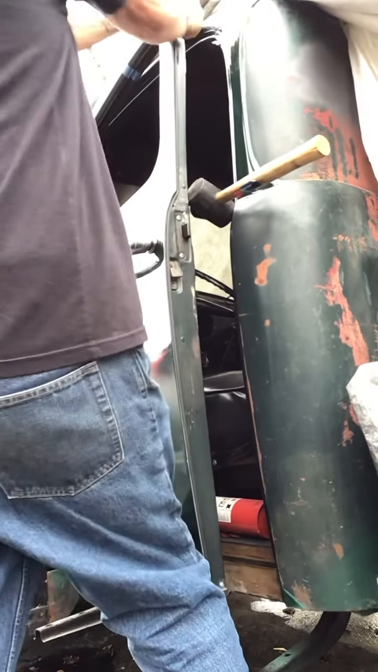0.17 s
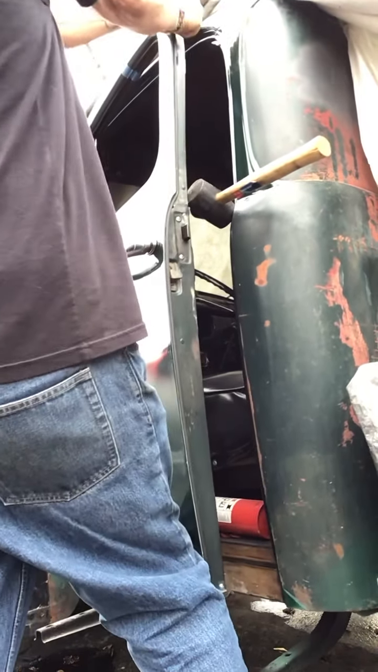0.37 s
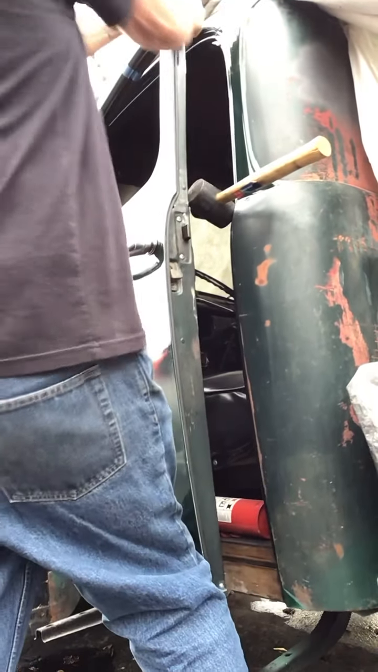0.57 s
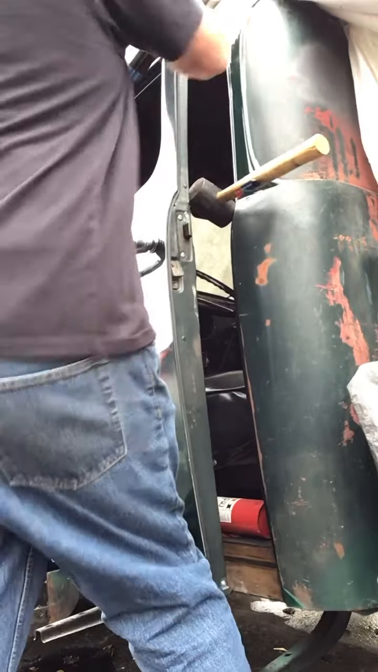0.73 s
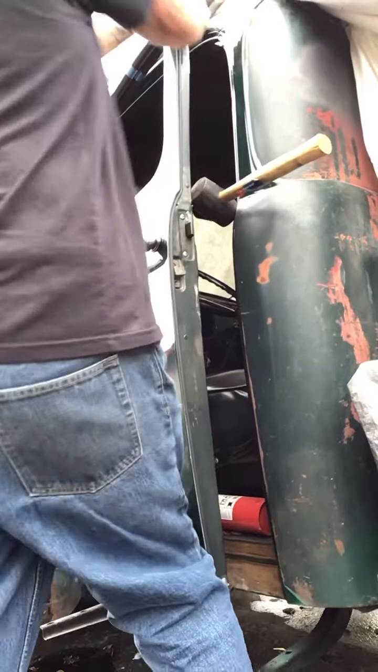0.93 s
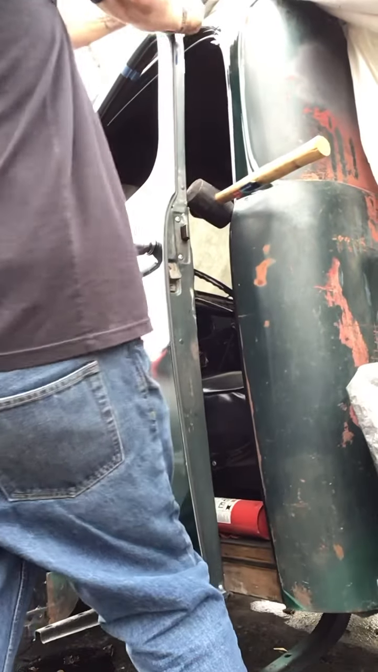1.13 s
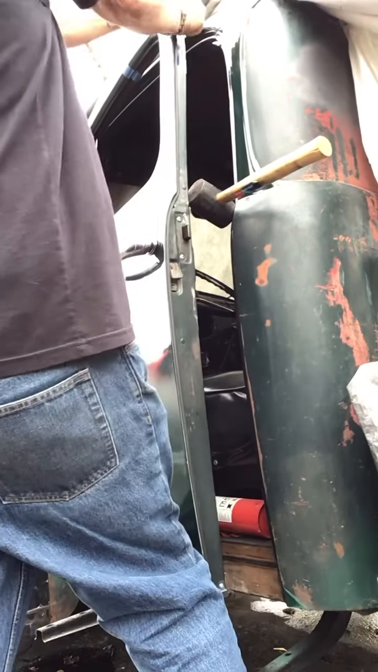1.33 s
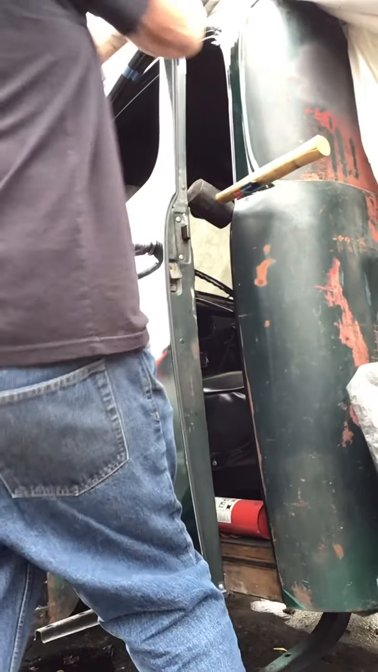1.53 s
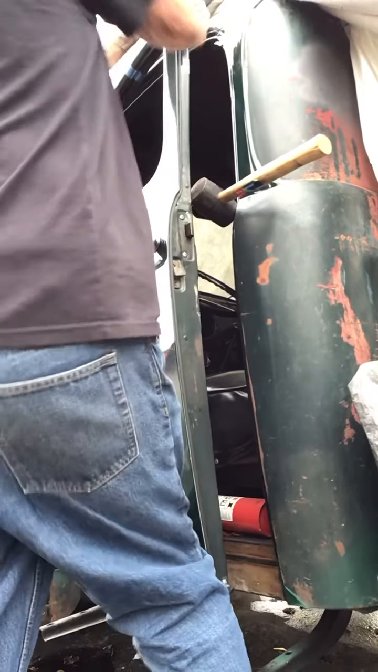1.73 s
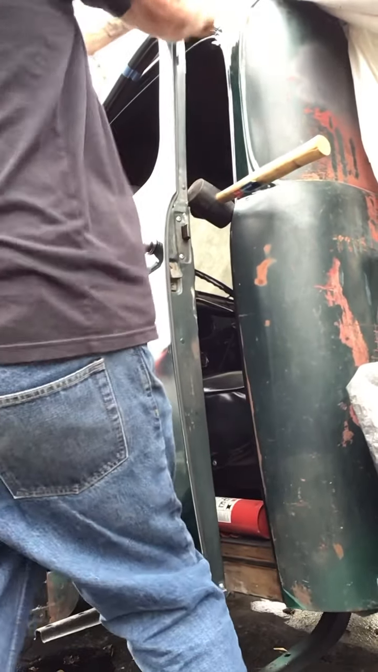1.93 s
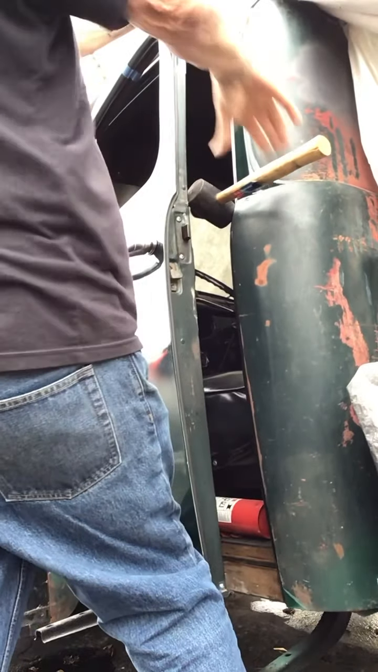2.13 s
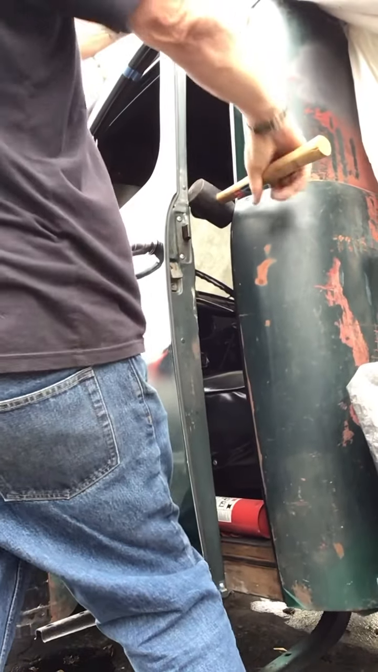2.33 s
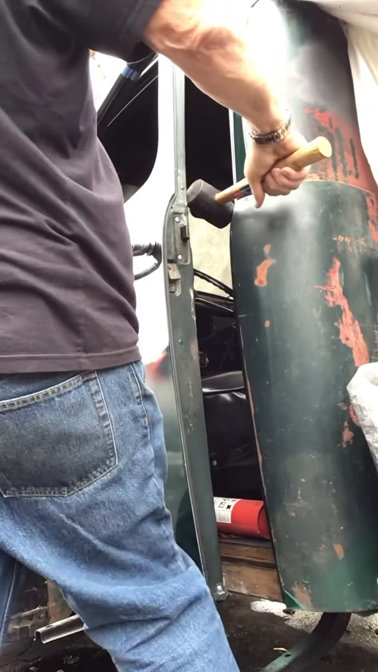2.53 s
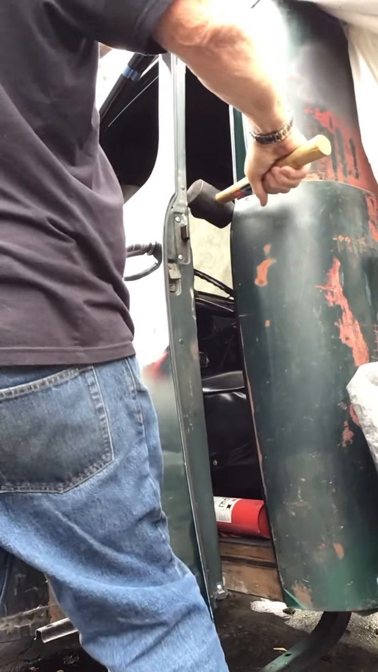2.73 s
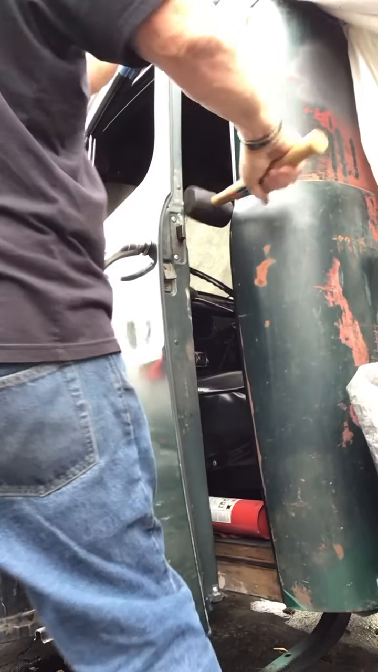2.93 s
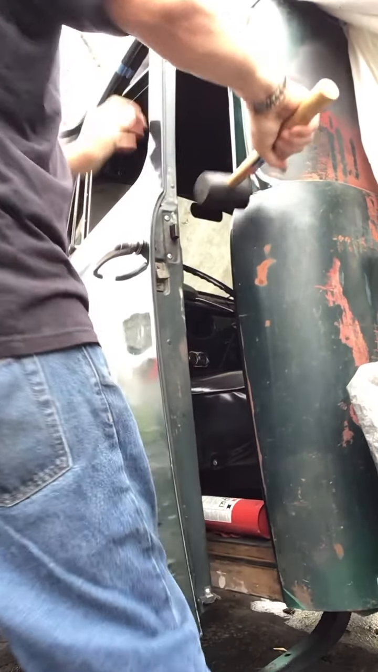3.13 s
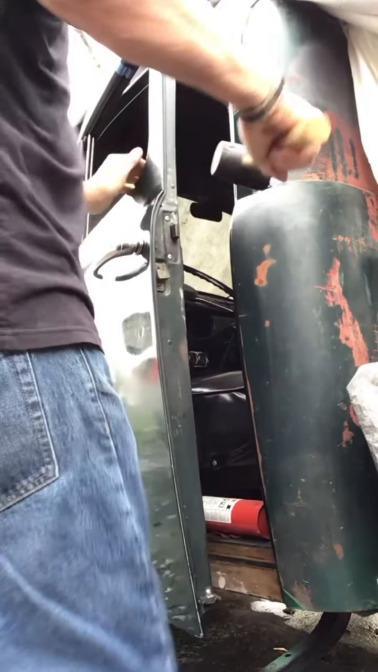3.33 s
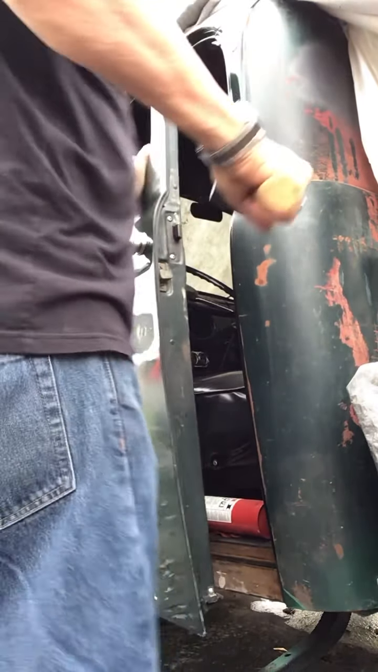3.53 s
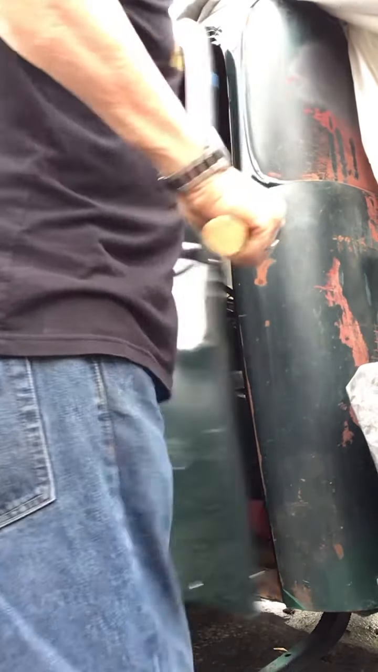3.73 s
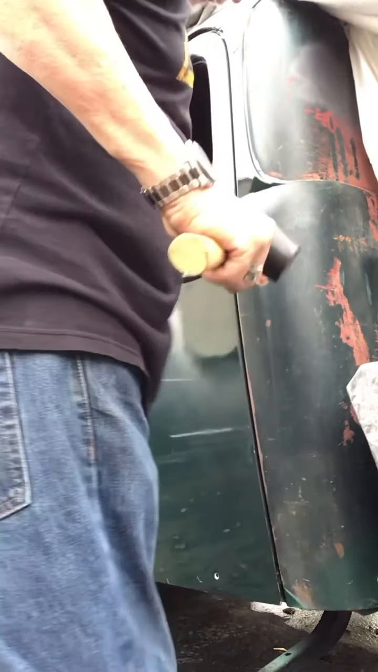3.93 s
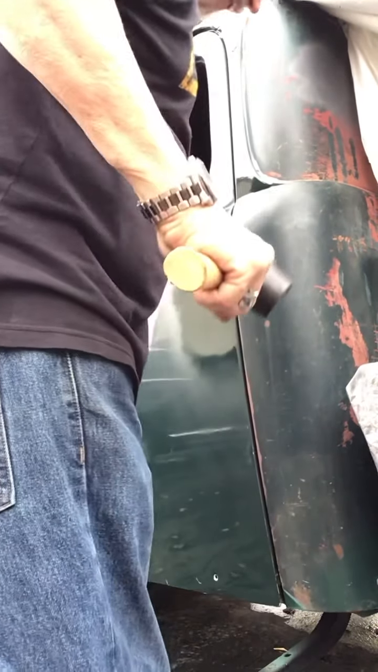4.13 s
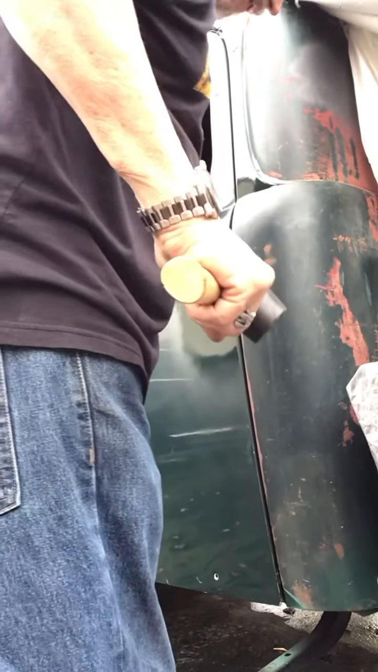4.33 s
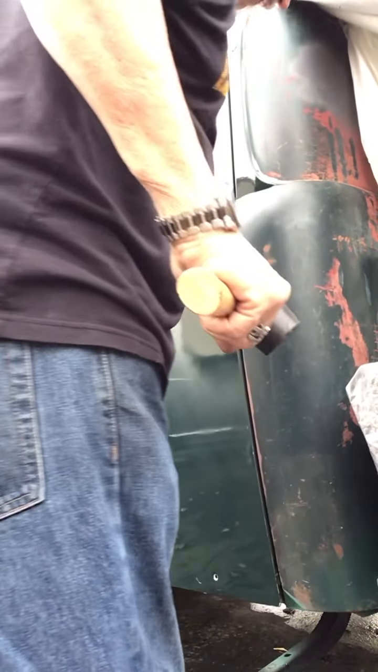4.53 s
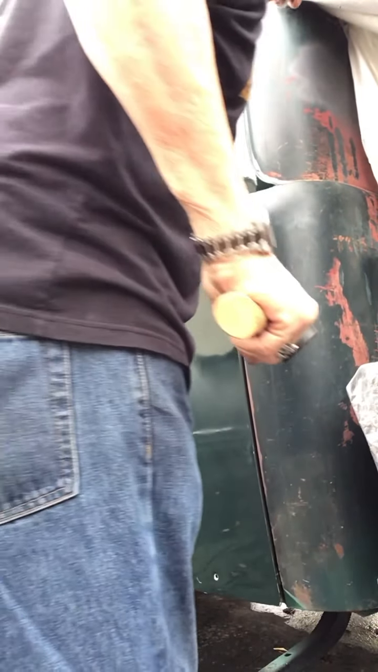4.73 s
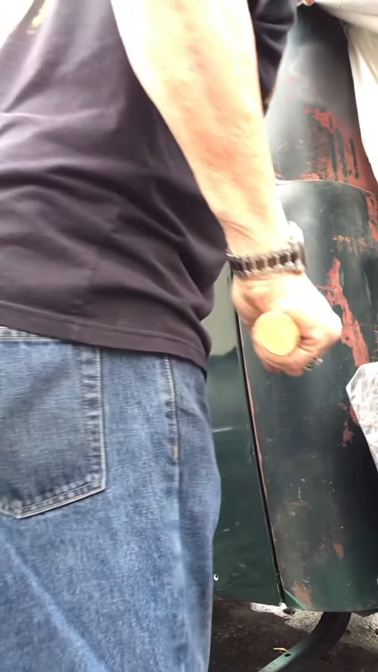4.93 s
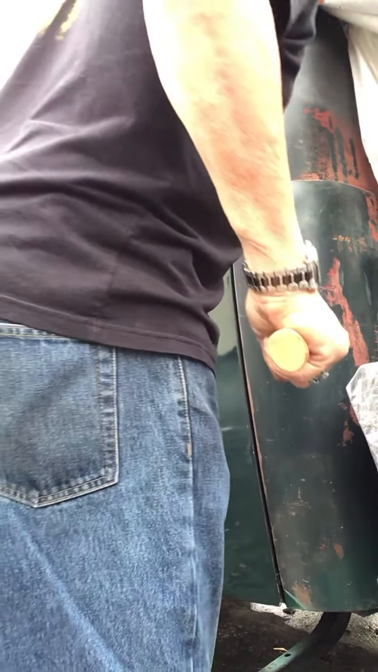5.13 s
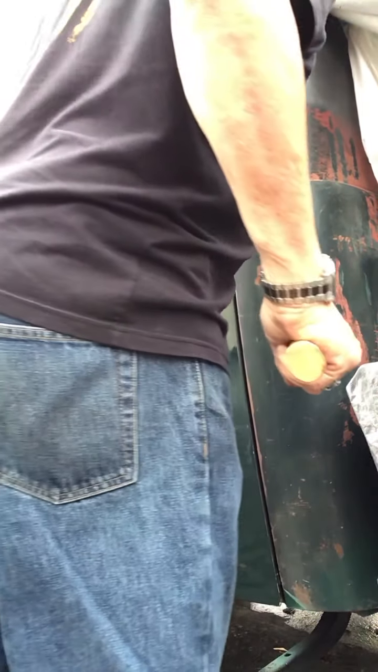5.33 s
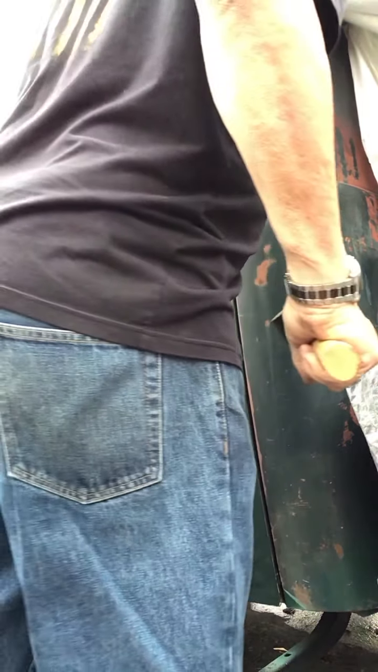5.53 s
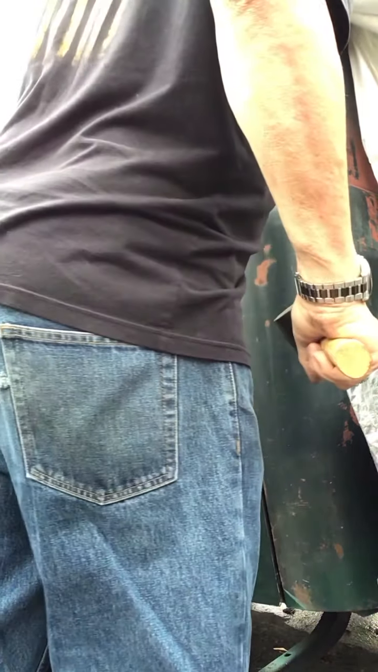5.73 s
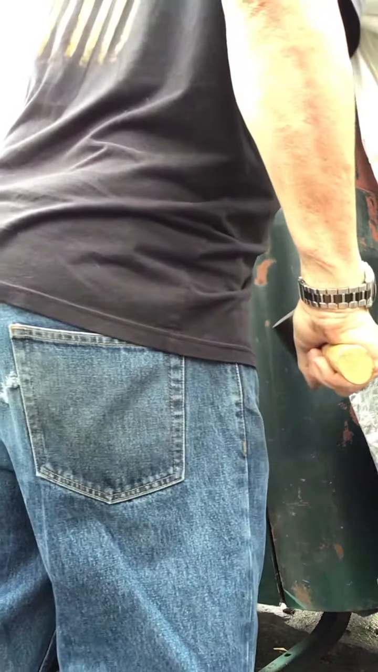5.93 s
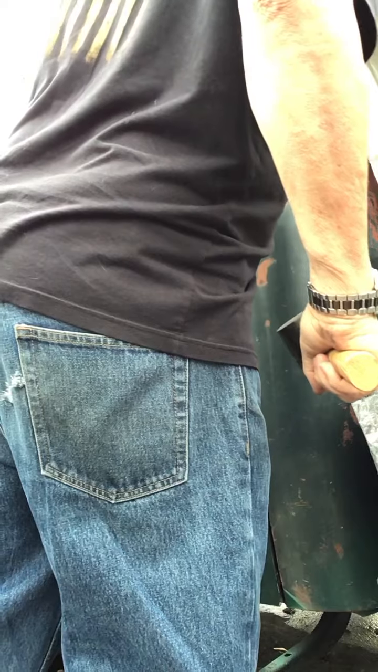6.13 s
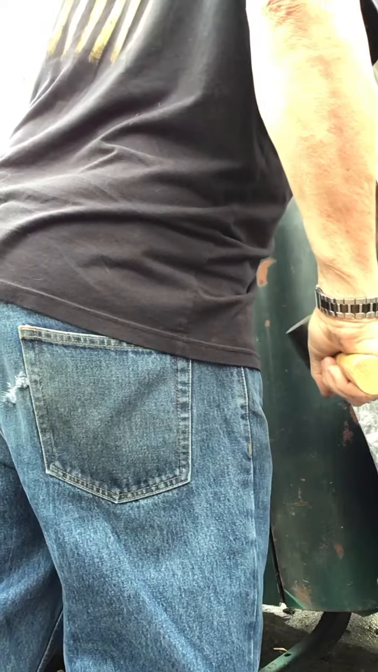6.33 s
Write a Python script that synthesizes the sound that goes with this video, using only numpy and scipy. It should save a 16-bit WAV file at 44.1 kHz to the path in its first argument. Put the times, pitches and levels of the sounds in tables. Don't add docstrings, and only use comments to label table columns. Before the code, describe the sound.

Outdoors, quiet handling, soft bumps and a scraped mallet lead to one very loud metal truck door slam that booms, rattles and fades.

```python
import sys
import numpy as np
from scipy import signal
from scipy.fft import rfft, irfft, next_fast_len
from scipy.io import wavfile
from scipy.ndimage import uniform_filter1d, map_coordinates

SR = 44100
rng = np.random.default_rng(int(sys.argv[2]) if len(sys.argv) > 2 else 0)


def ratio(d):
    e = np.asarray(d, float) / 20
    return 10 ** e


def unload_audio(sound):
    columns = np.transpose(np.atleast_2d(sound))
    steps = np.round(np.clip(columns, -1, 1) * 32767)
    wavfile.write(sys.argv[1], SR, steps.astype(np.int16))


N = 286650
SLAM_S = 3.691
PATCHY_DB = 0.9

# [f/Hz, level/dB per Hz]
FIBRE_SPECTRUM = [(4000, -120), (6000, -6), (8000, 0), (12000, -5), (16000, -5)]


def unit(x):
    return x / np.sqrt(np.mean(x ** 2) + 1e-20)


def along(points, hz):
    f, v = np.transpose(points)
    return np.interp(np.log(hz + 1), np.log(f + 1), v)


def curves(rows):
    s, *cols = np.transpose(rows)
    return [np.interp(np.arange(N) / SR, s, c) for c in cols]


def while_on(rows):
    t = np.arange(N) / SR
    on = (t > rows[0][0]) & (t < rows[-1][0] + .006)
    return uniform_filter1d(1. * on, size=120)


def wobble(rate_hz):
    knots = rng.standard_normal(int(N * rate_hz / SR) + 4)
    return map_coordinates(knots, [np.arange(N) * rate_hz / SR])


def coloured(x, spectrum):
    m = next_fast_len(len(x) + 8192)
    gain = ratio(along(spectrum, np.fft.rfftfreq(m, 1 / SR)))
    return unit(irfft(rfft(x, m) * gain, m)[:len(x)])


def gritty(grain_db, rate_hz):
    return rng.standard_normal(N) * ratio(grain_db * wobble(rate_hz))


def dying(spectrum, decay, count, patchy_db=0):
    noise = coloured(rng.standard_normal(count), spectrum)
    hz, t, z = signal.stft(noise, SR, nperseg=512)
    patches = uniform_filter1d(rng.standard_normal(z.shape), size=3, axis=0)
    patches = unit(uniform_filter1d(patches, size=4, axis=1))
    t60_s = np.maximum(along(decay, hz), .02)[:, None]
    return signal.istft(z * ratio(patchy_db * patches - 60 * t / t60_s), SR, nperseg=512)[1][:count]


def ring(hz, t60_s, t, rise_s):
    rise = 1 - np.exp(-t / max(rise_s, 1e-4))
    return ratio(-60 * t / max(t60_s, .002)) * np.sin(2 * np.pi * hz * t) * rise


def add(track, s, sound):
    part = track[round(s * SR):][:len(sound)]
    part += sound[:len(part)]


def traffic():
    # [t/s, level/dB]
    nearness = [(0, -40), (.8, -42.5), (1.15, -48), (1.5, -43.5), (2.1, -44.5), (2.8, -45), (3.15, -50.5),
                (3.3, -43.5), (3.55, -48), (4.1, -48.5), (4.75, -51.5), (5.25, -46.5), (5.7, -48),
                (6.1, -47.5), (6.5, -46.5)]
    # [f/Hz, level/dB per Hz]
    rumble_spectrum = [(15, -74), (25, -42.5), (32, -33.5), (34, -25), (45, -15.5), (70, 0.5), (85, 0.5),
                       (162, -12), (250, -24.5), (320, -46.5), (550, -120)]
    # [f/Hz, level/dB per Hz]
    drone_spectrum = [(88, -24.5), (150, -3), (249, -10.5), (321, -5.5), (398, -13), (790, -15),
                      (871, -16.5), (1600, -22), (1950, -26), (2300, -29.5), (3700, -36), (11300, -43.5),
                      (15100, -48), (16000, -57)]
    rumble_db, = curves(nearness)
    lumps = ratio(1.2 * wobble(4.5))
    rumble = ratio(rumble_db) * unit(lumps * coloured(rng.standard_normal(N), rumble_spectrum))
    drone_db = -55 + 0.087 * (rumble_db - rumble_db.mean())
    return rumble + ratio(drone_db + 0.22 * wobble(1.7)) * coloured(rng.standard_normal(N), drone_spectrum)


def far_notes():
    # [start/s, end/s, f/Hz, width/Hz, level/dB]
    engine_notes = [
        (0, 0.72, 65, 8.8, -44),
        (0, 1.98, 85, 14, -46.5),
        (0.5, 3.6, 338, 24, -62.5),
        (5, 5.87, 300, 17, -66.5),
    ]
    # [start/s, end/s, f/Hz, width/Hz, level/dB]
    insect_notes = [
        (2.0, 2.45, 14900, 700, -83),
    ]
    steady_hz = 5.9
    out, t = np.zeros(N), np.arange(N) / SR
    for start, end, hz, width_hz, db in [*engine_notes, *insect_notes]:
        fade = np.clip(np.minimum(t - start + 0.074, end - t) / 0.24, 0, 1)
        steady = min(steady_hz / width_hz, 1)
        size = 1.26 * steady + (1 - steady / 2) * wobble(width_hz)
        skew = (1 - steady / 2) * wobble(width_hz)
        phase = 2 * np.pi * hz * t
        out += ratio(db) * fade * (size * np.sin(phase) + skew * np.cos(phase))
    return out


def bird():
    # [start/s, length/s, top f/Hz, level/dB, last f/Hz]
    calls = [
        (1.884, 0.11, 9180, -63, 8200),
        (2.047, 0.12, 9040, -62.5, 8140),
        (2.241, 0.12, 9000, -66.5, 7650),
        (5.843, 0.078, 9070, -71, 8100),
    ]
    # [share of length, share of climb, share of drop, level/dB]
    whistle_shape = [
        (0, 0, 0, -8),
        (.3, .5, 0, -2),
        (.55, .86, 0, 0),
        (.75, 1, 0, -1),
        (.87, 1, .45, -7),
        (1, 1, 1, -10),
    ]
    start_hz, hoarse = 8180, .2
    out = np.zeros(N)
    for start, length, top_hz, db, last_hz in calls:
        call = []
        for share, climb, drop, shape_db in whistle_shape:
            pitch_hz = start_hz + climb * (top_hz - start_hz) - drop * (top_hz - last_hz)
            call.append((start + share * length, pitch_hz, db + shape_db))
        hz, level_db = curves(call)
        phase = 2 * np.pi * np.cumsum(hz * (1 + .035 * hoarse * wobble(500))) / SR
        out += while_on(call) * ratio(level_db + 4.5 + 2.8 * wobble(150)) * np.sin(phase)
    return out


def rustle():
    # [f/Hz, level/dB per Hz]
    cloth_spectrum = [(900, -120), (1500, -11), (2800, -4), (6000, -14), (8000, -17.5), (16000, -44)]
    # [t/s, level/dB]
    door_swing = [
        (3.535, -76),
        (3.565, -58.5),
        (3.598, -52),
        (3.625, -55.5),
        (3.655, -54.5),
        (3.672, -54),
        (3.683, -52.5),
    ]
    # [f/Hz, level/dB per Hz]
    swish_spectrum = [(1060, -28), (1800, -1), (2280, -9.5), (3260, 0), (5060, -7), (6650, -5.5),
                      (15000, -20), (16000, -23)]
    # [peak t/s, peak/dB, length/s, brightness/dB]
    moves = [(0.153, -66, 0.078, -4), (.4, -85, .4, -10), (0.563, -73, 0.088, -8), (0.637, -67.5, 0.043, 1),
             (0.768, -72, 0.38, -6), (1.044, -64, 0.069, -1), (1.238, -74, 0.17, 1), (1.474, -72, 0.2, -5),
             (1.845, -76, 0.047, 3), (1.877, -68.5, 0.42, -3), (2.056, -75, 0.055, -10),
             (2.152, -75.5, 1, 1.5), (2.375, -67, .04, -6), (2.404, -69, .06, -11), (2.55, -78, .3, -13),
             (2.88, -70, 0.21, -10), (3.052, -56.5, 0.07, -7.5), (3.074, -67, 0.033, -8),
             (3.377, -71.5, 0.17, -1), (4.067, -63.5, 0.11, -21), (4.22, -75.5, 0.068, -13),
             (4.55, -82, .3, -4), (4.839, -78, 0.26, -7), (5.252, -73, 0.23, -5), (5.421, -77.5, .12, 3.5),
             (5.74, -74, 0.064, 3.5), (5.981, -71.5, 0.14, -19), (6.161, -71, 0.14, -11),
             (6.348, -68, .09, -16.5), (6.378, -61.5, 0.064, -8.5), (6.426, -61.5, 0.037, -5.5)]
    rise_share, range_db = .35, 13.5
    dull = coloured(gritty(1.96, 300), cloth_spectrum)
    bright = coloured(gritty(2.2, 300), FIBRE_SPECTRUM)
    t = np.arange(N) / SR
    out = while_on(door_swing) * ratio(curves(door_swing)[0]) * coloured(gritty(1.2, 200), swish_spectrum)
    for s, db, length, bright_db in moves:
        away = np.maximum((s - t) / rise_share, (t - s) / (1 - rise_share)) / length
        out += ratio(db - range_db * away) * (dull + ratio(bright_db + 0.5) * bright)
    return out


def grips():
    # [f/Hz, level/dB per Hz]
    low_spectrum = [(90, -45), (150, 6.5), (300, 1.5), (500, -11), (900, -20), (1500, -40), (4000, -120)]
    # [f/Hz, level/dB per Hz]
    high_spectrum = [(400, -60), (650, 4), (850, -7), (1050, -2), (1300, -1), (2000, -5), (2600, -3.5),
                     (4000, -28), (8000, -120)]
    # [peak t/s, peak/dB, rise/s, fall/s, thinness/dB]
    slides = [
        (.61, -48, .03, 0.12, -23),
        (.84, -51, 0.067, 0.14, -21),
        (1.06, -61.5, 0.014, 0.12, 6),
        (1.5, -48, 0.036, 0.09, -23),
        (1.83, -59.5, .02, 0.17, 3),
        (2.89, -43.5, 0.046, 0.054, -25),
        (6.38, -65, .05, 0.069, 15),
    ]
    low = coloured(gritty(1.7, 60), low_spectrum)
    high = coloured(gritty(3.3, 250), high_spectrum)
    out, t = np.zeros(N), np.arange(N) / SR
    for s, db, rise, fall, thin_db in slides:
        swell = ratio(db - 12.2 * np.maximum((s - t) / rise, (t - s) / fall))
        out += swell * (ratio(-max(thin_db, 0)) * low + ratio(min(thin_db, 0)) * high)
    return out


def scrape():
    # [t/s, level/dB, brightness/dB]
    drag = [
        (3.2165, -47, -6),
        (3.227, -41.5, -8),
        (3.255, -40.5, -12.5),
        (3.275, -45, -6),
        (3.3, -44, 4),
        (3.312, -57, -8),
        (3.338, -68, -7),
        (3.39, -78, -4),
    ]
    # [f/Hz, level/dB per Hz]
    sill_spectrum = [(290, -26), (500, -5), (1090, -6), (1510, -12), (1670, -6.5), (2160, -10),
                     (2650, -4.5), (3440, -7.5), (4090, -2.5), (14000, -23.5), (16000, -32)]
    level_db, bright_db = curves(drag)
    grit = gritty(1.5, 300)
    sound = coloured(grit, sill_spectrum) + ratio(bright_db - 4.5) * coloured(grit, FIBRE_SPECTRUM)
    return while_on(drag) * ratio(level_db) * sound


def ticks():
    # [t/s, peak/dB, f/Hz]
    finger_clicks = [(.03, -63, 10100), (0.142, -52, 5900), (.55, -66, 11000), (0.634, -52.5, 8240),
                     (.81, -58, 4970), (.91, -60, 14000), (.975, -61, 9000), (1.037, -52, 5570),
                     (1.102, -60, 9000), (1.445, -67, 10000), (1.51, -62, 8000), (1.759, -62, 7000),
                     (1.906, -57, 5030), (2.405, -56, 3830), (2.929, -52, 11000), (2.934, -42, 11300),
                     (2.949, -57, 11000), (2.998, -55, 10300), (3.042, -49.5, 8500), (3.83, -37, 7940),
                     (5.43, -66.5, 9990), (5.735, -67.5, 13030), (5.817, -57, 6980), (6.256, -63, 11000),
                     (6.371, -58, 9000)]
    # [t/s, peak/dB, f/Hz, t60/s]
    metal_pings = [(.71, -60, 12600, .05), (.73, -62, 2930, .17), (.75, -64, 3000, .12),
                   (1.515, -61, 12600, .04), (1.541, -57.5, 2740, .03), (1.839, -61, 2830, 0.12),
                   (2.976, -48, 3580, .015), (2.981, -45.5, 3800, 0.013), (3.052, -51, 4000, .03),
                   (3.078, -55, 4870, .03), (3.683, -43, 2840, .063), (3.714, -32, 8000, 0.036),
                   (3.725, -28, 4050, 0.078), (3.735, -39, 4280, .05), (3.787, -47, 5100, 0.046),
                   (3.807, -51, 4000, .04), (3.868, -49, 5280, .07), (3.882, -52, 5170, .05),
                   (3.838, -49, 15400, .07), (3.842, -41, 2870, 0.049), (3.825, -46, 5150, .08),
                   (3.85, -42, 5180, 0.14), (3.925, -52, 2610, 0.12), (3.949, -53, 3050, .04),
                   (4.055, -61, 2850, 0.04), (4.068, -60, 2800, .04), (4.085, -58.5, 2350, 0.061),
                   (4.215, -61.5, 2350, 0.065), (5.275, -61.5, 2400, 0.047), (6.0, -70, 4160, 0.23),
                   (6.175, -69, 4160, .1), (6.422, -59, 3000, 0.032)]
    # [t/s, peak/dB, f/Hz]
    mallet_slips = [(3.2195, -52, 4500), (3.2287, -34, 3220), (3.229, -37, 1800), (3.233, -33, 3070),
                    (3.2335, -38, 4100), (3.2345, -43, 9300), (3.244, -37, 1610), (3.2437, -36, 4100),
                    (3.2445, -44, 2720), (3.251, -35, 2680), (3.2525, -41, 4100), (3.257, -40, 2700),
                    (3.265, -36, 2650), (3.267, -46, 5700), (3.274, -41, 2570), (3.28, -39, 2880),
                    (3.28, -45.5, 12800), (3.2845, -41, 2900), (3.283, -31, 11100), (3.2855, -31.5, 9450),
                    (3.29, -43, 8300), (3.292, -39, 4300), (3.2955, -38, 13200), (3.298, -34, 6200),
                    (3.3, -31.5, 4000), (3.302, -35, 7000), (3.302, -35, 3380), (3.307, -41, 3700)]
    contacts = [(*row, 0.02, 0.94) for row in finger_clicks]
    contacts += [(*row, 0.13) for row in metal_pings]
    contacts += [(*row, 0.015, 0.2) for row in mallet_slips]
    out, t = np.zeros(N), np.arange(SR // 10) / SR
    for s, db, hz, t60_s, click in contacts:
        mode_ratios = 1 + (0.011 + 0.049 * click) * rng.standard_normal(5)
        modes = sum(ring(hz * k, t60_s, t, 0.00032) for k in mode_ratios)
        snap_ratios = np.exp(0.32 * rng.standard_normal(8))
        snap = sum(ring(min(hz * k, 15500), 0.0063, t, .0002) for k in snap_ratios)
        add(out, s, ratio(db - 9.5) * (modes + 1.1 * click * snap))
    return out


def knocks():
    # [t/s,
    # peak/dB, f/Hz, t60/s, sheet steel/dB]
    body_knocks = [(.582, -47.5, 454, 0.23, -8), (.655, -47, 367, 0.9, -16), (0.722, -35, 113, 0.17, -25),
                   (.82, -37, 173, 0.16, -16), (1.54, -38, 190, 0.077, -8), (2.878, -41.5, 279, 0.39, -6.5),
                   (2.878, -38.5, 354, 0.22, -16), (2.878, -31, 124, 0.2, -27),
                   (2.893, -29, 126.6, 0.17, -25), (2.882, -48, 690, 0.11, -10), (2.876, -43, 515, .1, -10),
                   (2.93, -30.5, 140, 0.18, -19), (2.971, -32, 127, 0.26, -25), (2.994, -34, 129, 0.12, -27),
                   (3.056, -30.5, 109, 0.15, -16), (3.315, -31, 490, 0.026, -27),
                   (3.315, -36, 224.9, 0.04, -31.5), (3.695, -15, 310, 0.055, -30),
                   (3.71, -19, 401, 0.12, -30.5), (3.7, -28, 460, 0.25, -29), (3.745, -28, 551, 0.33, -31),
                   (3.701, -9, 217, 0.089, -30), (3.703, -17, 131, 0.066, -29),
                   (3.961, -24.5, 123.5, 0.24, -25.5), (4.679, -34, 160, 0.14, -14.5),
                   (4.7, -31, 98.8, 0.15, -28.5),
                   (1.052, -35, 1530, 0.033, -26), (1.053, -35.5, 2090, 0.047, -12),
                    (1.053, -39.5, 608, 0.075, -23), (1.076, -52, 2110, 0.16, -6),
                    (1.1, -53, 2350, .14, -8), (1.128, -57, 2250, .12, -12), (1.151, -54, 2200, .1, -14),
                    (1.815, -40.5, 1630, 0.024, -8), (1.8145, -42, 1150, .03, -9),
                    (1.816, -46, 2180, 0.071, -12), (1.828, -40.5, 655, 0.14, -16),
                    (1.828, -40, 1060, .05, -25), (1.844, -47, 1593, .07, -9), (1.862, -48, 1855, .08, -12),
                    (1.876, -49, 1850, 0.11, -14), (1.885, -52, 2480, 0.14, -9),
                    (1.905, -58, 2200, 0.073, -12), (3.645, -41, 1300, 0.044, -6),
                    (3.652, -43, 700, .04, -1), (1.068, -50, 1450, 0.089, -14), (1.087, -54, 1980, .1, -11),
                    (1.112, -55, 2000, .07, -9), (1.166, -55, 2300, .04, -9), (1.083, -47, 640, 0.054, -22),
                    (1.826, -46, 1830, .05, -16), (1.858, -49, 680, .05, -20), (1.885, -52, 1050, .12, -10),
                    (1.903, -50, 2560, .06, -12), (1.916, -44.5, 1130, 0.036, -6),
                    (3.714, -17, 1460, .05, -14), (3.727, -15, 1343, .05, -20),
                    (3.743, -17, 1160, .04, -20), (3.798, -25, 814, 0.065, -9), (3.81, -34, 1360, .07, -18),
                    (3.905, -43, 1620, 0.16, -20), (3.935, -46, 1300, 0.11, -22),
                    (4.018, -49, 1640, .12, -20), (4.088, -51, 1450, 0.056, -20)]
    panel_spectrum = [(100, 9), (400, 4.0), (2200, -12.5), (3500, -28.5), (9000, -62.5)]  # f/Hz, dB per Hz
    panel_decay = [(100, 0.45), (3000, 0.22)]  # f/Hz, t60/s
    out, t = np.zeros(N), np.arange(SR // 3) / SR
    for s, db, hz, t60_s, panel_db in body_knocks:
        spread = 0.026 * np.clip(hz / 1500, 0, 1.5)
        ratios = 1 + spread * rng.standard_normal(4)
        note = sum(ring(hz * k, t60_s, t, 0.0014 + 0.74 / hz) for k in ratios) / 4
        panel = dying(panel_spectrum, panel_decay, count=len(t)) * (1 - np.exp(-t * hz / 4))
        add(out, s, ratio(db) * note + ratio(db + panel_db) * panel)
    return out


def echoes(x):
    # [f/Hz, t60/s]
    yard_decay = [(200, 0.24), (2000, 0.14), (5000, 0.13), (9000, 0.2), (16000, .1)]
    tail = dying([(20, 0.0013), (20000, 0.00026)], yard_decay, count=SR // 2)
    return signal.fftconvolve(np.pad(x, (400, 0)), tail / np.linalg.norm(tail))[:N]


def rattle():
    first_db, fading_t60_s, wait_s = -28.5, 0.42, .09
    middle_hz, grain_t60_s, scatter_db = 2617, .017, 3
    out, t = np.zeros(N), np.arange(SR // 30) / SR
    for wait, pitch, size in rng.standard_normal((90, 3)):
        late_s = wait_s * abs(wait) * 1.5
        level_db = first_db + scatter_db * size - 60 * late_s / fading_t60_s
        hz = min(middle_hz * np.exp(.45 * pitch), 15000)
        add(out, SLAM_S + .022 + late_s, ratio(level_db) * ring(hz, grain_t60_s, t, .0005))
    return out


def latch():
    # [t/s, crack/dB, striker ring/dB, brightness 0-1]
    strikes = [(3.6909, -15.5, -21, 0), (3.6924, -15.5, -2.5, 0), (3.6955, -20, -28, .6),
               (3.7023, -14, -19.5, 0.4), (3.702, -16.5, -7.5, 0.5), (3.7045, -9.5, -7.5, 0.6),
               (3.7065, -18.5, -15.5, .7), (3.712, -18.5, -22.5, .7), (3.7165, -23, -27, .6),
               (3.721, -20.5, -23, .4), (3.7225, -17.5, -28, .5), (3.728, -19.5, -25.5, .5)]
    # [f/Hz, level/dB, t60/s]
    striker_modes = [(1121, -10.5, 0.012), (1260, -0.5, .018), (1320, -0.5, 0.021), (1450, -5.5, 0.018),
                     (2490, -13.5, 0.031), (3000, -10, .02), (4000, -13.5, 0.022), (5423, -18.5, .03),
                     (6300, -15, .02), (11000, -25, .015)]
    out, t = np.zeros(N), np.arange(SR // 8) / SR
    for s, crack_db, ring_db, bright in strikes:
        striker = sum(ratio(db + rng.normal(0, 1.2)) * ring(hz, t60_s, t, 0.00032)
                      for hz, db, t60_s in striker_modes)
        hiss = rng.standard_normal(len(t))
        crack = unit(hiss - bright * np.roll(hiss, 1)) * ratio(-60 * t / 0.014)
        add(out, s, ratio(crack_db) * crack + ratio(ring_db - 5.5) * striker)
    return out


def boom():
    # [f/Hz, level/dB, t60/s]
    cab_modes = [(56.3, -9.5, .34), (73.2, -8, 0.25), (81.3, -6.5, 0.2), (91, -26, 1.38), (94.7, -20, 0.98),
                 (106.5, -13.5, 0.13), (133.4, -21, .73), (136.4, -6, 0.21)]
    # [f/Hz, level/dB, t60/s]
    pan_modes = [(59.3, -35.5, 1.5), (63.56, -19.5, 1.3), (68.3, -22, 2.42), (75.8, -20.5, 0.76)]
    # [f/Hz, level/dB, t60/s]
    skin_modes = [(123.2, -20.5, 0.5), (146, -19, 0.33), (175.7, -20.5, 0.36), (194, -25.5, 1.0),
                  (209.7, -17.5, 0.3), (236, -25.5, 1), (265.4, -16, 0.3), (288.7, -19.5, 0.3),
                  (315, -14, 0.48), (336, -24.5, .58), (352, -24, 0.33), (362, -25, 0.57),
                  (374.7, -19, 0.65), (818, -22, 0.22)]
    seat_s, pan_s, frame_s = 3.7175, 3.698, 3.7035
    out, t = np.zeros(N), np.arange(2 * SR) / SR
    add(out, seat_s, sum(ratio(db) * ring(hz, t60_s, t, 0.016) for hz, db, t60_s in cab_modes))
    add(out, pan_s, sum(ratio(db) * ring(hz, t60_s, t, 0.027) for hz, db, t60_s in pan_modes))
    for k, (hz, db, t60_s) in enumerate(skin_modes):
        flutter_db = 0.8 * wobble(25)[:len(t)]
        add(out, frame_s, ratio(db + flutter_db) * (-1) ** k * ring(hz, t60_s, t, 0.01))
    return out


def steel_roar():
    # [f/Hz, level/dB per Hz]
    sheet_spectrum = [(60, -41), (120, -16.5), (237, -12.5), (363, -8), (450, -13), (556, -15.5),
                      (873, -22), (1340, -20.5), (2260, -30), (5180, -36.5), (10000, -35), (16000, -46.5)]
    # [f/Hz, t60/s]
    sheet_decay = [(60, 4.7), (150, 1.65), (300, 0.7), (700, 0.59), (1500, 0.48), (3000, 0.55),
                   (6000, 0.49), (12000, 0.39), (16000, .3)]
    # [f/Hz, level/dB per Hz]
    burst_spectrum = [(180, -29.5), (300, -13.5), (502, -18.5), (603, -7.5), (725, -25.5), (801, -5),
                      (1040, -12.5), (1280, -12), (2610, -25.5), (12300, -24.5), (16000, -40.5)]
    # [f/Hz, t60/s]
    burst_decay = [(300, 0.096), (1200, 0.22), (4000, 0.36), (10000, 0.1), (16000, 0.4)]
    # [t/s, level/dB]
    surges = [(3.69, -0.5), (3.699, -2.5), (3.712, -1.5), (3.722, 0.5), (3.75, -1.5), (3.785, -1),
              (3.805, -2), (3.84, 0.5), (3.875, -1), (3.94, 1), (3.97, 0)]
    roar, t = np.zeros(N), np.arange(2 * SR) / SR
    trim = ratio(-2.5 * np.exp(-t / 0.017))
    sheet = dying(sheet_spectrum, sheet_decay, count=len(t), patchy_db=PATCHY_DB)
    add(roar, SLAM_S, ratio(-16) * trim * (1 - np.exp(-t / 0.02)) * sheet)
    burst = dying(burst_spectrum, burst_decay, count=len(t), patchy_db=PATCHY_DB)
    add(roar, SLAM_S, ratio(-13.5) * trim * (1 - np.exp(-t / 0.00816)) * burst)
    low = uniform_filter1d(roar, size=48)
    chatter_db = 1.9 * wobble(110)
    return low + ratio(curves(surges)[0] + chatter_db) * (roar - low)


def slam():
    return latch() + boom() + steel_roar()


def scene():
    background = traffic() + far_notes()
    song = bird()
    near = ticks() + knocks() + scrape()
    walls = echoes(ratio(-15.0) * near + ratio(-6) * song)
    return (background + song + rustle() + grips() + near + walls + rattle() + slam())[None]


def top_cut(x):
    return signal.sosfilt(signal.butter(12, 17010, fs=SR, output="sos"), x)


def record(dry):
    mic_hz, top_hz, full_scale = 47.3, 15670, 1.05
    hz = np.fft.rfftfreq(N, 1 / SR)
    band_limit = np.clip((top_hz - hz) / 300, .08 * (hz < 17000), 1)
    bass_cut = 1 / np.sqrt(1 + (mic_hz / (hz + 1)) ** 8)
    heard = irfft(rfft(dry) * band_limit * bass_cut, N)
    mix = heard / (1 + np.abs(heard / full_scale) ** 6) ** (1 / 6)
    return top_cut(mix)


dry = scene()
out = record(dry)
unload_audio(out)
```